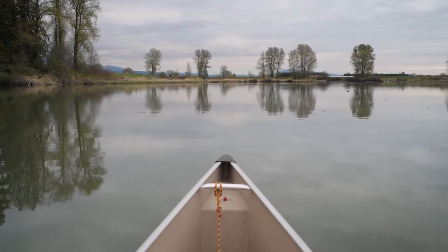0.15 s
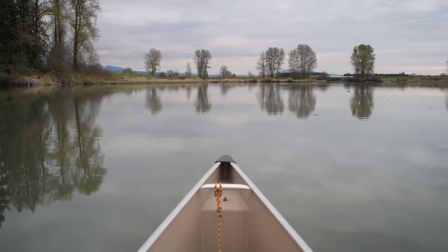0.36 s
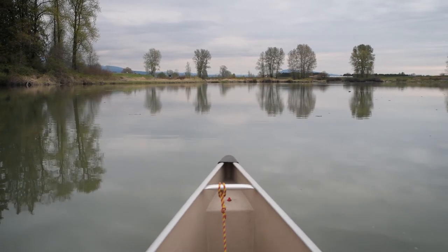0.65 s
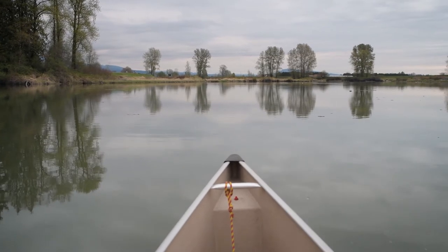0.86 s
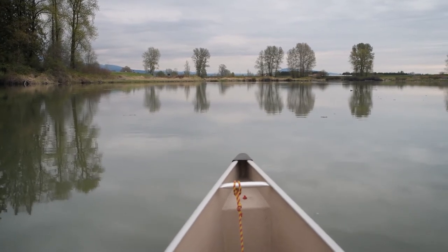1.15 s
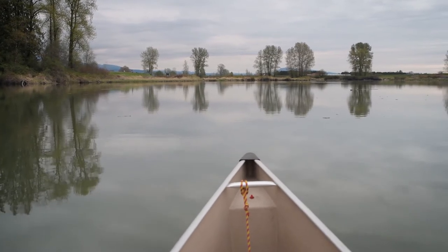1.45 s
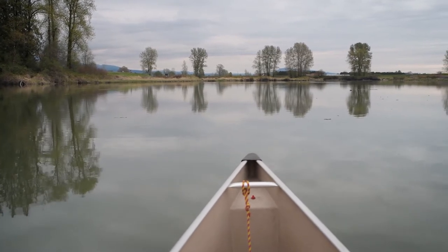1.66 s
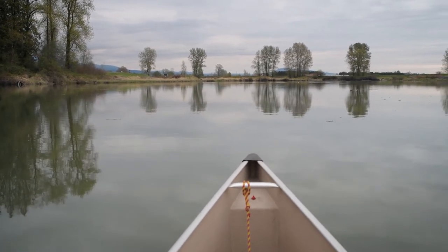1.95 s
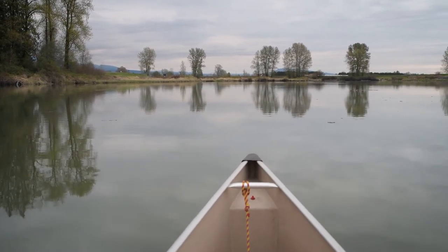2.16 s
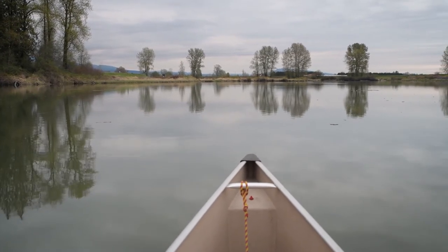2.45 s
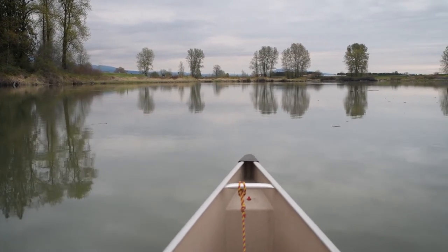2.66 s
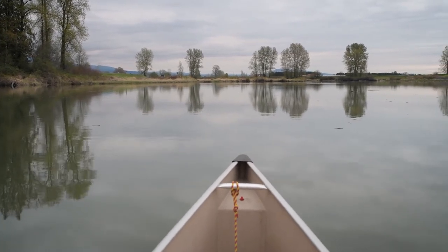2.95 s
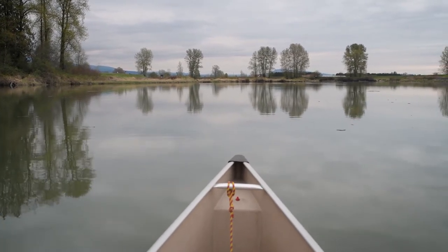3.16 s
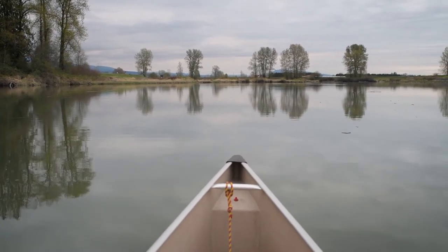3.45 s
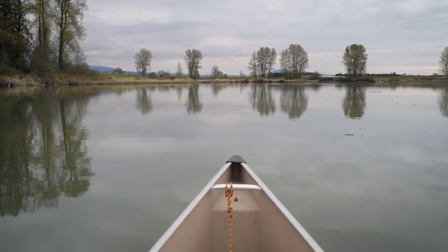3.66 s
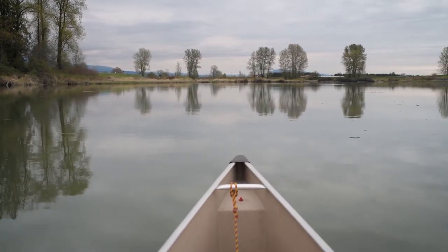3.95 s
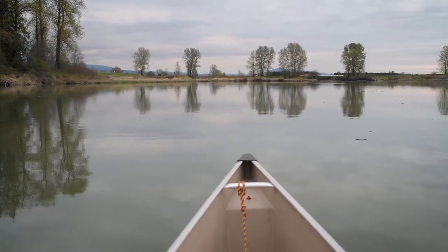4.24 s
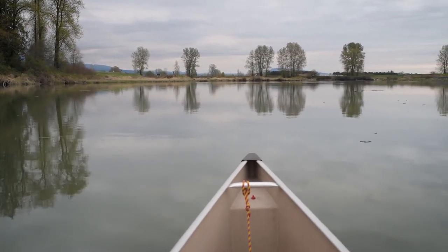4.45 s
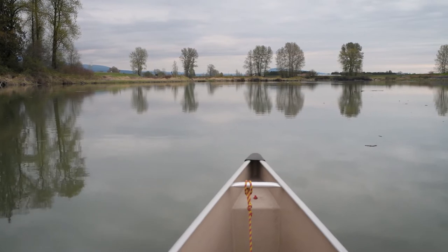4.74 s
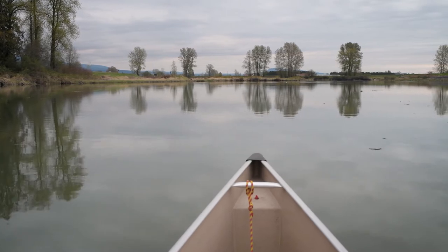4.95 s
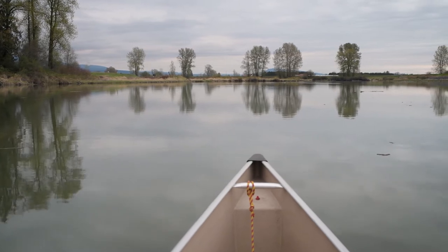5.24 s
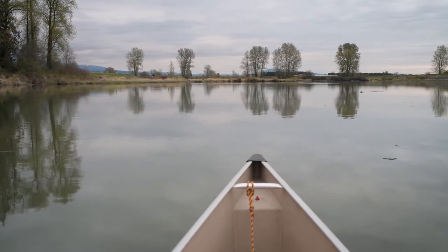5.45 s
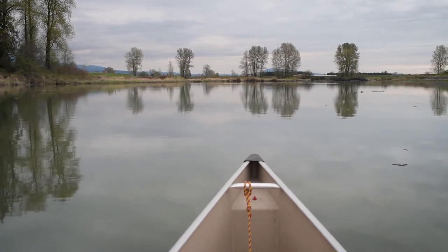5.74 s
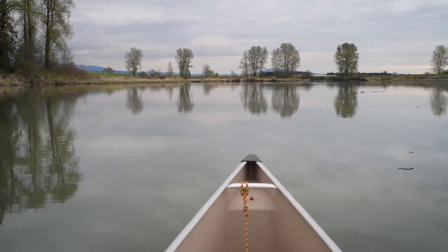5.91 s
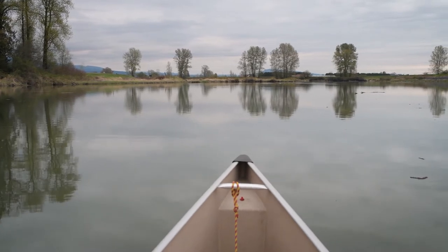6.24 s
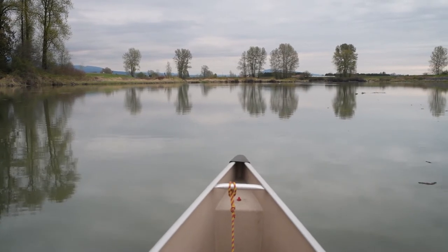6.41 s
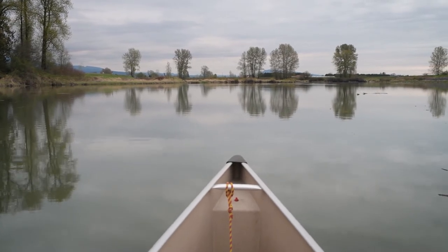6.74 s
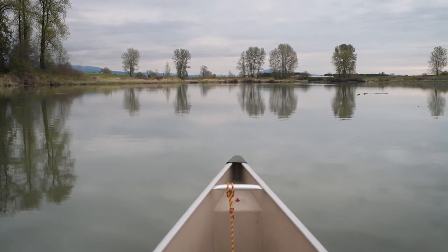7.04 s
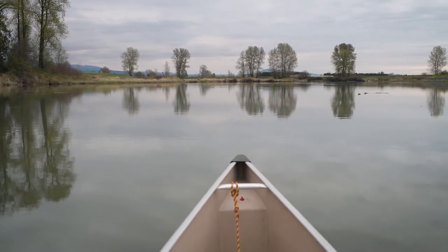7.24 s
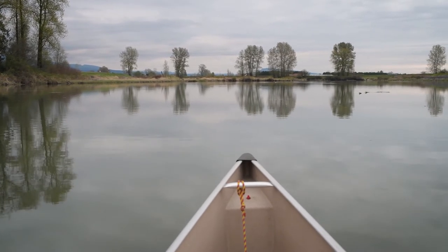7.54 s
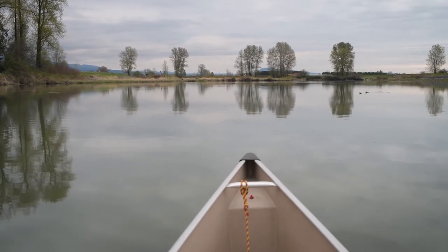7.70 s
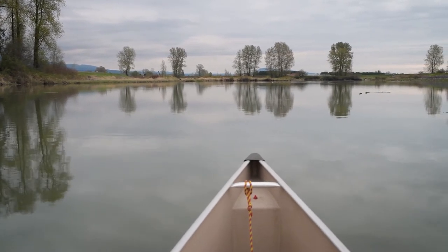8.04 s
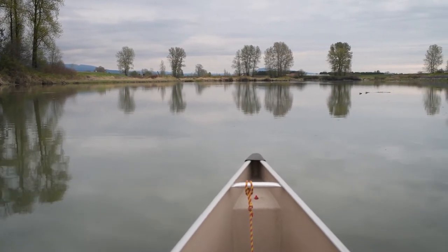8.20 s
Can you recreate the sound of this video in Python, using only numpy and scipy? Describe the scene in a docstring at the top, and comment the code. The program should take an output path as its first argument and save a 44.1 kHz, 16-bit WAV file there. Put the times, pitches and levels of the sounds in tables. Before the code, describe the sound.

Calm outdoor river ambience: bright droplets and small splashes against soft airy rumble, overlapping bird chirps, four nasal quacks, then faint distant ducks.

```python
"""A canoe drifts on a calm marshy river, in the rumble and hiss of open air (shaped noise).
From the start, arched chirps, slurs and thin trills (gliding sines) come from the bank, and water
splashes, plops and drips (ringing bubbles). A duck quacks four times nearby from 0.9 s (slaps ringing
a throat); crackles tick from 1.5 s (noise bursts). A soft bump (low noise) follows at 4.9 s; distant
ducks, heard once at 0.3 s, answer from 5.6 s."""
import sys
import numpy as np
from scipy import signal
from scipy.io import wavfile
from scipy.ndimage import uniform_filter1d, map_coordinates

SR = 44100
rng = np.random.default_rng(int(sys.argv[2]) if len(sys.argv) > 2 else 0)


def digitize_waveform(pressure):
    """Quantize a signal to 16-bit integers and store it at the path in sys.argv[1].

    Rows of a 2-D input are taken as channels; values are limited to [-1, 1].
    """
    field = np.atleast_2d(pressure).T
    bounded = np.clip(field, -1, 1)
    quanta = np.round(bounded * 32767).astype(np.int16)
    wavfile.write(sys.argv[1], SR, quanta)


N = 369116

# All event levels are before the gains in scene().
# drops hitting the water: t/s, peak/dB, ring f/Hz
DROPS = [(.1451, -44, 5500), (.474, -39.5, 3470), (0.5784, -38, 2680), (0.8137, -14, 2930),
         (.897, -26, 3390), (1.3876, -42.5, 4580), (1.617, -23, 2000), (1.6912, -35.5, 3660),
         (1.7365, -47, 4970), (1.7673, -40, 5230), (1.7902, -34, 5020), (1.8988, -43.5, 3420),
         (1.9697, -43, 4360), (2.0606, -42, 4400), (2.11, -31, 3340), (3.0611, -29, 2690),
         (3.1, -38.5, 2630), (3.5956, -34, 3700), (3.6203, -30, 3530), (3.659, -35, 4950),
         (3.703, -40, 3050), (3.7458, -37, 2560), (3.9573, -39.5, 3360), (4.0378, -42, 4820),
         (4.266, -13, 4180), (4.2802, -26.5, 2630), (4.3285, -38.5, 3620), (4.524, -38.5, 3830),
         (4.5987, -40, 3530), (5.0956, -33.5, 3400), (5.1063, -28, 2790), (5.2306, -34, 2820),
         (6.0774, -43, 3630), (6.5, -45.5, 5200), (6.53, -44.5, 5300), (6.597, -43.5, 3470),
         (6.8581, -12, 3750), (6.8615, -13, 3290), (6.9208, -16, 3660), (6.952, -22, 4160),
         (6.99, -34, 4030), (7.0416, -41.5, 3900), (7.2653, -31.5, 4820), (7.4147, -30.5, 4300),
         (7.429, -21.5, 4630), (7.465, -31.5, 4290), (7.6112, -37.5, 3740), (7.6695, -29.5, 3370),
         (8.251, -36.5, 3780)]
# sloshes: loudest t/s, time of the last 20 dB of swell/s, gurgle t60/s, gurgle level/dB, gurgle f/Hz,
# gurgle spread (relative), spray level/dB, spray f/Hz
SLOSHES = [(0.041, 0.073, 0.27, -48, 1220, 0.53, -54.5, 3360),
           (.679, 0.027, 0.14, -32.5, 1090, 0.52, -41, 3140),
           (.805, .04, 0.16, -36.5, 1118, .35, -23.5, 3700),
           (0.816, 0.0063, 0.066, -17, 1460, 0.49, -16.5, 3200),
           (.85, .02, .2, -35, 1966, 0.29, -32.5, 3530), (.94, 0.062, 0.31, -45, 1000, .25, -36, 3430),
           (2.056, 0.043, .15, -55.5, 783, 0.26, -56, 4200),
           (3.992, 0.027, 0.079, -50.5, 993, 0.44, -48, 3620),
           (4.175, 0.01, 0.23, -45, 1140, 0.24, -51, 3700),
           (4.277, 0.013, 0.047, -27.5, 1108, 0.29, -31.5, 3500),
           (4.406, 0.013, .12, -49.5, 1276, 0.083, -61, 3800),
           (4.499, 0.023, 0.085, -37.5, 1160, 0.25, -47.5, 3050),
           (4.6, 0.019, .11, -37, 1210, 0.54, -60, 3670), (4.681, .046, 0.12, -47, 910, 0.58, -55, 3700),
           (4.84, 0.028, 0.16, -40.5, 624, 0.32, -52, 3400),
           (5.11, .065, 0.11, -39.5, 1270, 0.452, -54, 3420),
           (7.278, 0.0092, 0.28, -50, 997, 0.2, -44, 3950),
           (7.441, 0.034, .16, -62, 1210, 0.32, -45.5, 4520),
           (7.53, 0.05, 0.34, -39.5, 1020, 0.22, -46.5, 2960),
           (7.679, 0.061, 0.07, -44.5, 980, 0.46, -37.5, 3140),
           (7.93, 0.039, 0.22, -43, 1204, 0.21, -56, 3350), (8.17, .043, 0.077, -51, 800, 0.63, -56, 3400),
           (8.286, 0.015, 0.39, -55.5, 1480, 0.42, -51, 3220)]


def amp(db):
    """Decibels to gain."""
    return 10 ** (np.asarray(db) / 20)


def evened(x):
    """Scales to an rms of one."""
    return x / np.sqrt(np.mean(x ** 2) + 1e-20)


def read(points, hz):
    """Reads a curve on a log-frequency axis."""
    f, value = np.transpose(points)
    return np.interp(np.log(hz + 1), np.log(f + 1), value)


def add(mix, s, sound):
    """Mixes a sound in at time s, cropped to the mix."""
    start = round(s * SR)
    sound = sound[max(-start, 0):]
    part = mix[max(start, 0):][:len(sound)]
    part += sound[:len(part)]


def band(x, hz, kind, order=2):
    """Causal Butterworth high-pass or low-pass."""
    return signal.sosfilt(signal.butter(order, hz, kind, fs=SR, output="sos"), x)


def waver(size, hz):
    """Smooth chance of about unit rms: a spline through hz random knots a second."""
    knots = rng.standard_normal(256)
    return map_coordinates(knots, [np.arange(size) * hz / SR], order=3, mode="wrap")


def resonate(x, hz, width_hz):
    """Resonance of peak gain about 1; hz may be a curve: shift down to 0 Hz, smooth, shift back."""
    turn = np.exp(2j * np.pi * np.cumsum(hz * np.ones(len(x))) / SR)
    r = np.exp(-np.pi * width_hz / SR)
    smooth = signal.lfilter([1 - r], [1, -r], x / turn + 1e-18)
    return 2 * (turn * smooth).real


def air(level_db=-55.5, patchy_db=2, rumble_hz=260):
    """Stereo shaped noise: low rumble that swells and sinks, and a softly shifting hiss."""
    # spectrum: f/Hz, relative density/dB
    spectrum = [(20, -15), (40, 0), (60, 5.5), (140, 0.5), (210, -12), (330, -17), (500, -23), (800, -17.5),
                (1500, -14), (2100, -16.5), (2900, -14.5), (3900, -10.5), (5400, -17.5), (7200, -28.5),
                (10000, -31), (15500, -31.5)]
    # rumble: t/s, boost at lowest f/dB
    rumble = [(0, 3.5), (1.302, -1.5), (1.7, 4.5), (2.149, 1), (2.95, 5.5), (3.15, -4), (4.851, -4),
              (5.029, 4.5), (5.252, -0.5), (7.3, -3.5), (7.851, 0.5), (8.37, -3)]
    # left-right correlation: f/Hz, correlation
    likeness = [(100, 1), (2500, 0.99), (5000, 0.71), (8000, 0.73), (13000, .65)]
    frames, hz = N // 512 + 5, np.fft.rfftfreq(2048, 1 / SR)
    a, b, c, d, patches = rng.standard_normal((5, frames, len(hz)))
    patches = uniform_filter1d(uniform_filter1d(patches, 7, 0), 25, 1)
    patches = evened(patches) * (hz < 7000)
    rumble_db = np.interp(np.arange(frames) * 512 / SR, *np.transpose(rumble))[:, None]
    rumble_db = rumble_db / (1 + (hz / rumble_hz) ** 4)
    same = np.clip(read(likeness, hz), -1, 1)
    left = a + 1j * b
    right = same * left + np.sqrt(1 - same ** 2) * (c + 1j * d)
    z = np.array([left, right]) * amp(read(spectrum, hz) + patchy_db * patches + rumble_db)
    noise = signal.istft(z.swapaxes(1, 2), nperseg=2048, noverlap=1536)[1][:, :N]
    return amp(level_db) * evened(noise)


def whistle(hz, level_db, wobble=0.0099, flutter_db=2.0, fade=0.55):
    """A nearly pure tone with a slight quaver in pitch and level; fade is the tapered share."""
    size = len(hz)
    phase = 2 * np.pi * np.cumsum(hz * (1 + wobble * waver(size, 250))) / SR
    level = amp(level_db + flutter_db * waver(size, 130))
    return np.sin(phase) * level * signal.windows.tukey(size, fade)


def slide(length_s, start_hz, end_hz, power=.72):
    """A pitch that glides one way, fastest at first (power under 1)."""
    return start_hz + (end_hz - start_hz) * np.linspace(0, 1, round(length_s * SR)) ** power


def far_chorus(count=150, level_db=-66, centre_hz=3400, octaves=0.36, glide_octaves=0.67):
    """Many faint slurs and a few held whistles from further along the bank."""
    # held whistles: t/s, length/s, level/dB, f/Hz
    held = [(0, 1, -65, 1520), (0.349, 0.093, -59, 2215), (5.724, 0.054, -62.5, 2260),
            (8.115, 0.43, -61, 4120)]
    out = np.zeros(N)
    for when, length, high, slope, loud in rng.random((count, 5)):
        start_hz = centre_hz * 2 ** (octaves * (high - .5))
        end_hz = start_hz * 2 ** (glide_octaves * (slope - .6))
        pitch_hz = slide(.025 + .025 * length, start_hz, end_hz)
        add(out, when * N / SR, whistle(pitch_hz, level_db + 5 * (loud - .5), fade=0.31))
    for s, length_s, held_db, hz in held:
        add(out, s, whistle(np.full(round(length_s * SR), hz), held_db))
    return out


def bubble(hz, t60, onset_s, rise=0.087):
    """A pocket of air rings and dies, peak 1; its pitch climbs as it nears the surface."""
    t = np.arange(round((t60 + 2 * onset_s) * SR)) / SR
    tone = np.sin(2 * np.pi * hz * t * (1 + rise * t / t60))
    ring = tone * amp(-60 * t / t60) * (1 - np.exp(-(t / onset_s) ** 2))
    return ring / abs(ring).max()


def cloud(s, rise_s, t60, level_db, centre_hz, spread, size_db=13):
    """Mixed bubbles that swell to level_db at time s and die away; gives start time and sound."""
    per_s, cycles, onset_cycles = 1300, 28, 2.8
    t = np.arange(-1.5 * rise_s, 1.9 * t60, 1 / SR)
    rings = np.zeros(len(t))
    chance = rng.random((700, 3))[:max(round(per_s * len(t) / SR), 8)]
    for k, (late, pitch, size) in enumerate(chance):
        hz = centre_hz * 2 ** (2.73 * spread * (pitch - .5))
        ring = bubble(hz, cycles / hz, onset_cycles / hz)
        add(rings, (k + late) / per_s - .005, amp(size_db * size ** 2) * ring)
    swell = amp(np.where(t < 0, 20 * t / rise_s, -60 * t / t60))
    rms = np.sqrt(np.average(rings ** 2, weights=swell ** 2))
    return s + t[0], amp(level_db) * swell * rings / rms


def splashes(spray_lasts=1.7, mist_lasts=2):
    """Each slosh gurgles, lets deeper bubbles up late, and throws spray and mist that outlast it."""
    deep_ratio, deep_db, deep_late_s = .53, -27.5, .011  # relative to the gurgle
    spray_spread, spray_late_s = 0.34, 0.0061
    mist_hz, mist_db = 6930, -24  # level relative to the spray
    out = np.zeros(N)
    for s, rise_s, t60, gurgle_db, gurgle_hz, spread, spray_db, spray_hz in SLOSHES:
        deep_hz, spray_s = gurgle_hz * deep_ratio, s + spray_late_s
        add(out, *cloud(s, rise_s, t60, gurgle_db, gurgle_hz, spread))
        add(out, *cloud(s + deep_late_s, rise_s, t60, gurgle_db + deep_db, deep_hz, .25))
        add(out, *cloud(spray_s, rise_s, t60 * spray_lasts, spray_db, spray_hz, spray_spread, size_db=20))
        add(out, *cloud(spray_s, rise_s, t60 * mist_lasts, spray_db + mist_db, mist_hz, 0.206))
    return out


def patter(count=900, centre_hz=3800, octaves=1.264, size_db=11):
    """Scattered droplets, each a tiny ping; louder after strong drips and sloshes, until it settles."""
    cycles, onset_s = 20, .0014
    stirred_db, calm_db, settle_s = -46.5, -60.5, 0.16  # levels of the largest droplets
    full_stir_db, stir_share = -38, 0.32  # a blow of this level has strength 1; share scales the dB gap
    blows = [(row[0], row[1]) for row in DROPS] + [(row[0], row[6]) for row in SLOSHES]
    blow_s, blow_db = np.transpose(blows)
    strength = amp(stir_share * (blow_db - full_stir_db))
    out = np.zeros(N)
    for k, (when, pitch, size) in enumerate(rng.random((count, 3))):
        s = (k + 2 * when) / count * N / SR
        hz = centre_hz * 2 ** (octaves * (pitch - .5))
        past = blow_s < s
        stirred = np.tanh(np.sum(strength[past] * np.exp((blow_s[past] - s) / settle_s)))
        level_db = calm_db + (stirred_db - calm_db) * stirred + size_db * (size ** 3 - 1)
        add(out, s, amp(level_db) * bubble(hz, cycles / hz, onset_s))
    return out


def arched(length_s, crest_hz):
    """A pitch that climbs to a flat crest and drops away."""
    crest, climb, drop = 0.612, 0.163, 0.31  # place in the chirp; shares of crest pitch gained and lost
    climb_power, drop_power = 2.6, 2.95  # the higher, the flatter the crest
    u = np.linspace(0, 1, round(length_s * SR)) - crest
    before, after = np.maximum(-u / crest, 0), np.maximum(u / (1 - crest), 0)
    return crest_hz * (1 - climb * before ** climb_power - drop * after ** drop_power)


def songbirds(echo_db=-18, echo_s=0.059):
    """Arched chirps and sliding whistles, each with one quick reflection from the trees."""
    # chirps: t/s, length/s, level/dB, crest f/Hz
    chirp_rows = [(0.014, 0.049, -46, 4180), (0.173, .052, -50.5, 4200), (0.239, 0.037, -34.5, 3370),
                  (.312, .032, -36.5, 3160), (0.347, 0.032, -40, 3290), (2.745, .07, -57, 3730),
                  (3.197, 0.047, -47, 4130), (3.362, .04, -49, 4310), (5.563, .036, -45.5, 3270),
                  (5.63, .042, -39.5, 3060), (6.065, 0.068, -34.5, 3116), (6.494, 0.063, -38, 3150),
                  (6.588, 0.069, -32.5, 3115)]
    # slurs: t/s, length/s, level/dB, start f/Hz, end f/Hz
    slur_rows = [(0.193, 0.092, -40.5, 3110, 3740), (.264, 0.048, -39.5, 2890, 2870),
                 (1.205, 0.059, -53, 3160, 2890), (2.092, 0.065, -43.5, 2840, 4430),
                 (2.095, 0.063, -45, 4470, 2720), (2.623, .05, -50.5, 3070, 3800),
                 (2.665, 0.02, -35, 2930, 3280), (2.687, 0.039, -35.5, 3660, 2964),
                 (2.696, 0.032, -39.5, 3010, 3770), (2.797, 0.029, -41.5, 3570, 3040),
                 (3.074, 0.032, -50, 3980, 3300), (3.291, 0.078, -46.5, 3590, 3640),
                 (4.367, .13, -49, 3530, 3640), (6.125, 0.039, -28.5, 2820, 2524),
                 (7.08, 0.051, -53, 3030, 2410), (7.182, 0.038, -54, 2800, 3650)]
    direct = np.zeros(N)
    for s, length_s, level_db, crest_hz in chirp_rows:
        add(direct, s, whistle(arched(length_s, crest_hz), level_db, fade=0.2))
    for s, length_s, level_db, start_hz, end_hz in slur_rows:
        add(direct, s, whistle(slide(length_s, start_hz, end_hz), level_db, fade=0.26))
    out = direct.copy()
    add(out, echo_s, amp(echo_db) * direct)
    return out


def plops(onset_s=0.0011, ring_share=0.85, train_db=-11, train_s=.011, count=5):
    """One large trapped bubble and a few that break off from it."""
    # large bubbles: t/s, peak/dB, ring f/Hz, nominal t60/s (ring_share or half of it sounds)
    plop_rows = [(.014, -39, 1378, 0.19), (.602, -35, 1344, 0.04), (.655, -27, 1050, 0.023),
                 (.672, -29, 1362, 0.084), (0.682, -39.5, 482, 0.11), (.816, -21, 1020, 0.026),
                 (.947, -34, 867, 0.12), (3.016, -33.5, 2024, 0.024), (3.895, -34, 1580, 0.015),
                 (4.166, -30.5, 1020, 0.049), (4.265, -27, 880, 0.049), (4.298, -25.5, 1396, 0.063),
                 (4.491, -39, 1137, .06), (4.588, -34, 1260, 0.049), (4.831, -28.5, 692, 0.06),
                 (5.136, -37.5, 830, 0.077), (5.367, -36, 1650, 0.033), (7.234, -28, 1380, 0.074),
                 (7.321, -32, 911, 0.098), (7.502, -37, 1004, 0.036), (7.67, -29.5, 1670, 0.047),
                 (7.922, -35, 1370, 0.047)]
    out = np.zeros(N)
    for s, peak_db, hz, t60 in plop_rows:
        add(out, s, amp(peak_db) * bubble(hz, ring_share * t60, onset_s))
        for late, pitch in zip(rng.exponential(1, count), rng.uniform(-.8, .9, count)):
            small = bubble(hz * 2 ** (.35 * pitch), t60 / 2, onset_s)
            add(out, s + 0.00214 + train_s * late, amp(peak_db + train_db - 0.87 * late) * small)
    return out


def drips(cycles=16, onset_s=.001, soft=1.88, tick_cycles=11, spatter_db=-18, spatter_s=0.0093, count=9):
    """A tick, a ping, then smaller droplets; gentle drops ring up and down more slowly."""
    # impact rings: ratio to the drop's ring f, level re drop/dB
    impact = [(.78, -15), (1.249, -12)]
    out = np.zeros(N)
    for s, peak_db, hz in DROPS:
        slow = np.interp(peak_db, [-30, -12], [soft, 1])
        add(out, s, amp(peak_db) * bubble(hz, slow * cycles / hz, slow * onset_s))
        for ratio, tick_db in impact:
            tick = bubble(hz * ratio, tick_cycles / (hz * ratio), onset_s)
            add(out, s + onset_s / 2, amp(peak_db + tick_db) * tick)
        for late, pitch in zip(rng.exponential(1, count), rng.uniform(-0.76, 1, count)):
            small_hz = hz * 2 ** (.35 * pitch)
            ping = bubble(small_hz, slow * cycles / small_hz, slow * onset_s)
            add(out, s + .0015 + spatter_s * late, amp(peak_db + spatter_db - late) * ping)
    return out


def quack(t, level_db, far=False):
    """Uneven slaps of the syrinx, with weaker ones between and some rasp, ring the throat."""
    # throat resonances: f/Hz, width of one pole before widening/Hz, relative level/dB
    throat = [(978, 197, -8), (1157, 280, -8), (2026, 560, 8.5), (3130, 520, -45.5), (5200, 100, -15)]
    pulse_hz, jitter, shimmer_db = 174.9, .045, 1.8
    stray, rasp = .33, (.3 if far else .055)
    turns = np.cumsum(pulse_hz * (1 + jitter * waver(len(t), pulse_hz))) / SR
    slaps = np.diff(np.floor(turns), prepend=0) * amp(shimmer_db * waver(len(t), pulse_hz))
    between = np.diff(np.floor(turns + .5 + .15 * waver(len(t), pulse_hz)), prepend=0) > 0
    noise = rng.standard_normal(SR // 2)[:len(t)]
    # the bill opens: the slaps take hold and the throat rises
    opening = np.minimum(3 * (t - t[0]) / (t[-1] - t[0]), 1)
    breath = rasp * noise * np.exp(-2 * opening * (turns % 1))
    drive = opening ** 2 * slaps + stray * between + breath
    mouth = 1 - 0.23 * (1 - opening)
    voice = np.zeros(len(t))
    for k, (hz, width_hz, db) in enumerate(throat):
        once = resonate(drive, hz * mouth, 1.12 * width_hz)
        twice = resonate(once, hz * mouth, 1.19 * width_hz)
        voice += amp(db) * twice * (-1) ** k  # alternate polarity
    voice = band(band(voice, 775, "high", order=8), 5630, "low", order=5)
    return evened(voice) * amp(level_db)


def far_ducks(bright_hz=2700):
    """The same voice with more rasp, faint and dulled by distance."""
    # distant quacks: t/s, length/s, level before fades and filters/dB
    far_rows = [(0.338, 0.093, -45), (5.64, 0.044, -39.5), (5.846, 0.037, -42), (6.144, 0.063, -43.5),
                (6.34, 0.053, -45), (6.58, 0.057, -42.5), (6.778, 0.076, -43.5), (7.027, 0.086, -40.5),
                (7.239, 0.074, -37.5), (7.465, 0.085, -34), (7.613, 0.11, -34), (7.91, 0.099, -40.5),
                (8.125, 0.12, -34)]
    out = np.zeros(N)
    for s, length_s, level_db in far_rows:
        t = np.arange(0, length_s, 1 / SR)
        add(out, s, quack(t, level_db, far=True) * signal.windows.tukey(len(t), .45))
    return band(band(out, bright_hz, "low", order=3), 1660, "high", order=3)


def trills(uneven_db=-1.5, uneven_pitch=0.011, slur_s=.043):
    """Small birds deep in the trees each repeat one slur at a steady pace, never quite the same."""
    # runs: first t/s, last t/s, spacing/s, first level/dB, last level/dB, slur start f/Hz, slur end f/Hz
    runs = [(0.362, .756, .051, -51.5, -55.5, 4730, 5570), (3.071, 3.533, .056, -48, -55.5, 4750, 5620),
            (3.452, 4.232, .129, -57, -52, 3700, 2410)]
    out = np.zeros(N)
    for first, last, spacing, first_db, last_db, start_hz, end_hz in runs:
        times = np.arange(first, last + spacing / 2, spacing)
        for s, (pitch, loud) in zip(times, rng.standard_normal((20, 2))):
            level_db = np.interp(s, [first, last], [first_db, last_db]) + uneven_db * loud
            hz = np.linspace(start_hz, end_hz, round(slur_s * SR)) * (1 + uneven_pitch * pitch)
            add(out, s, whistle(hz, level_db, wobble=0.0049, flutter_db=1.5, fade=.5))
    return out


def near_duck():
    """Each quack swells, holds while it grows a little, and stops short."""
    # near quacks: t/s, length/s, swell/s, level before envelope/dB
    near_rows = [(.872, 0.18, 0.088, -32), (1.548, 0.15, 0.057, -30), (2.176, 0.15, .044, -27),
                 (2.786, 0.16, 0.051, -25.5)]
    start_db, swell_power = -23, 1.5  # power above 1: the swell eases off towards the top
    growth_db_per_s, release_s, end_db = 14, 0.022, -50.5
    out = np.zeros(N)
    for s, length_s, swell_s, level_db in near_rows:
        t = np.arange(0, length_s, 1 / SR)
        attack_db = start_db * np.maximum(1 - t / swell_s, 0) ** swell_power
        growth_db = growth_db_per_s * (t - length_s / 2)
        release_db = end_db * np.maximum(1 - (length_s - t) / release_s, 0)
        add(out, s, quack(t, level_db + attack_db + growth_db + release_db))
    return out


def crackles(width_hz=3500, t60=.035):
    """Brief gritty ticks high in the treble: cubed noise through a wide resonance."""
    # ticks: t/s, peak/dB, centre f/Hz
    tick_rows = [(1.4511, -51, 7440), (1.507, -42, 8300), (1.534, -42, 13600), (1.567, -44.5, 8350),
                 (1.642, -40.5, 7900), (1.6644, -50, 7930), (3.3927, -52, 11000), (3.896, -53, 10760),
                 (6.9514, -49, 8290), (7.2619, -52, 9450)]
    out, t = np.zeros(N), np.arange(0, t60, 1 / SR)
    for s, peak_db, hz in tick_rows:
        grit = rng.standard_normal(len(t)) ** 3 * amp(-60 * t / t60)
        tick = band(resonate(grit, hz, width_hz), 4400, "high", order=4)
        add(out, s, amp(peak_db) * tick / abs(tick).max())
    return out


def hull(level_db=-51, hz=150, width_hz=120):
    """A soft low bump through the canoe: resonant noise; level_db is before the fade."""
    s, length_s = 4.93, .24
    size = round(length_s * SR)
    thud = resonate(resonate(rng.standard_normal(SR), hz, width_hz), hz, width_hz)[-size:]
    thud = evened(band(thud, 192, "low", order=6))
    out = np.zeros(N)
    add(out, s, amp(level_db) * thud * signal.windows.hann(size))
    return out


def bank(x):
    """A thin scattered echo from trees and reeds: sparse random taps, decaying by frequency."""
    # echo decay: f/Hz, t60/s
    decay = [(300, 0.45), (2000, 0.16), (4000, 0.18), (8000, 0.17)]
    sparse = rng.standard_normal(SR) * (rng.random(SR) < 2000 / SR)
    taps = sparse * (np.arange(SR) > .012 * SR)
    hz, t, z = signal.stft(taps, SR, nperseg=256)
    tail = signal.istft(z * amp(-60 * t / read(decay, hz)[:, None]), SR, nperseg=256)[1]
    return signal.fftconvolve(x, tail / np.linalg.norm(tail))[:N]


def scene():
    """Birds, water, crackles and bump straight ahead, their echo (birds, water), and the air around."""
    ducks = amp(-1.5) * near_duck() + amp(-10.0) * far_ducks()
    birds = songbirds()
    deep = amp(-0.5) * trills() + far_chorus()
    water = amp(3) * drips() + amp(0.5) * plops() + amp(1.5) * splashes() + amp(4) * patter()
    water = band(band(water, 6050, "low", order=4), 310, "high", order=4)
    echo = bank(amp(-15.5) * ducks + amp(-15.5) * birds + amp(-5.0) * deep + amp(-17.5) * water)
    return ducks + birds + deep + water + echo + amp(-0.5) * crackles() + hull() + air()


def record(dry, comb_hz=91.6, notch_width_hz=24, count=8, edge_hz=15850):
    """A row of evenly spaced narrow notches from the bass up, then a steep low-pass."""
    for k in range(1, count + 1):
        notch = signal.iirnotch(k * comb_hz, k * comb_hz / notch_width_hz, fs=SR)
        dry = signal.lfilter(*notch, dry)
    low_pass = signal.firwin(511, edge_hz, window=("kaiser", 9), fs=SR)
    return signal.oaconvolve(dry, low_pass[None], "same")


dry = scene()
out = record(dry)
digitize_waveform(out)
```